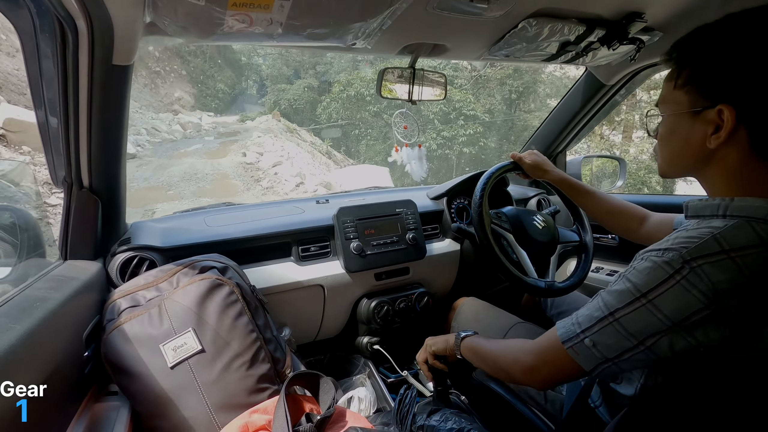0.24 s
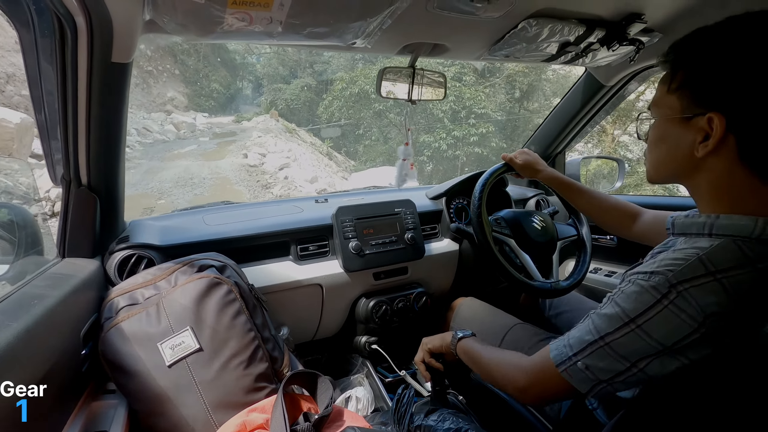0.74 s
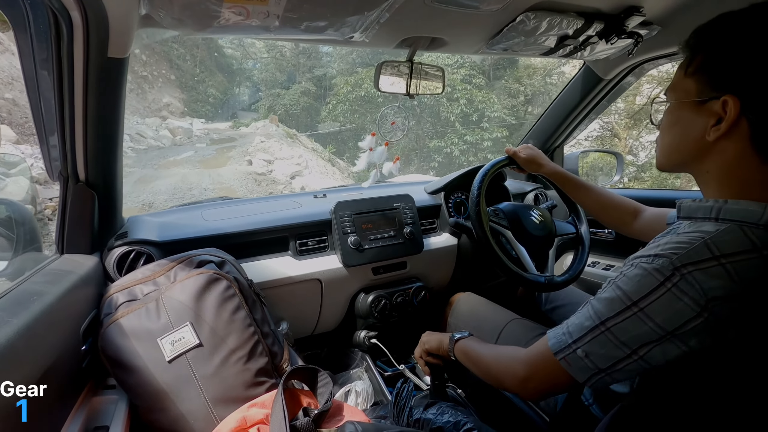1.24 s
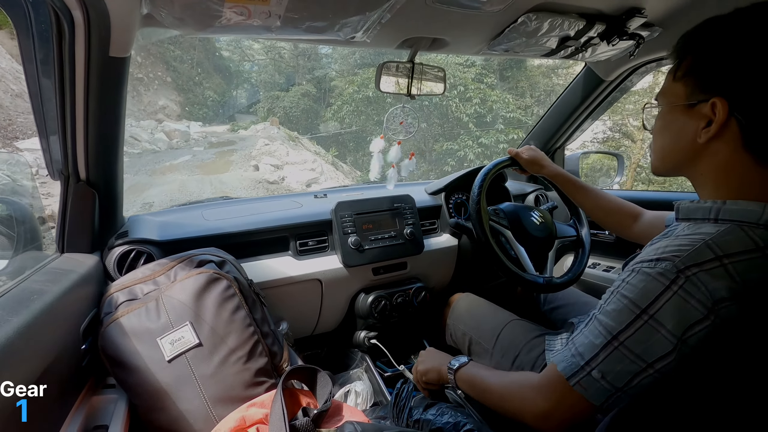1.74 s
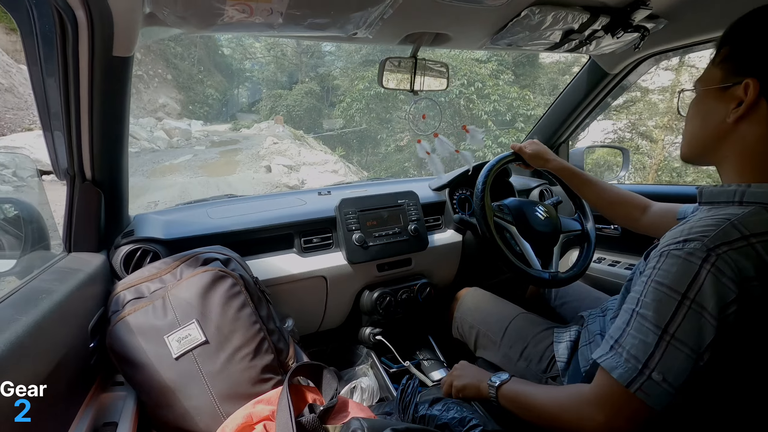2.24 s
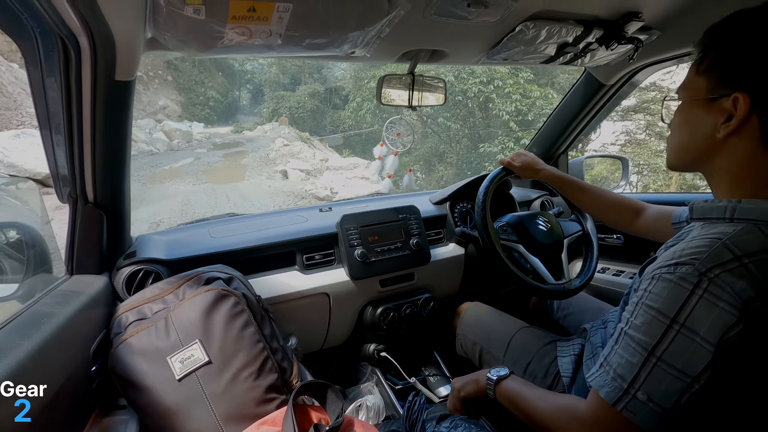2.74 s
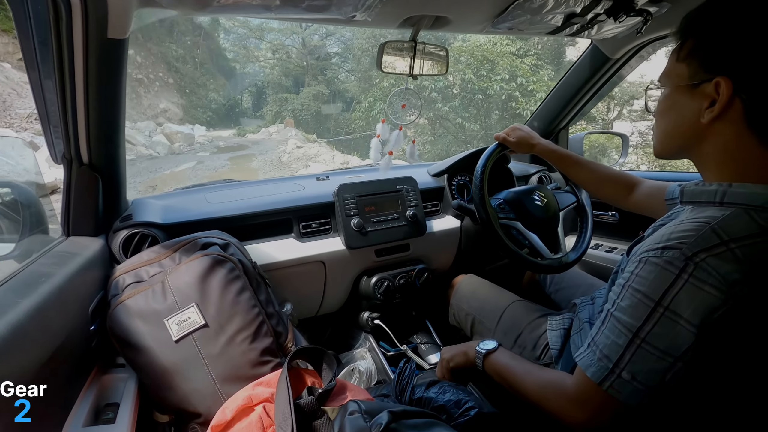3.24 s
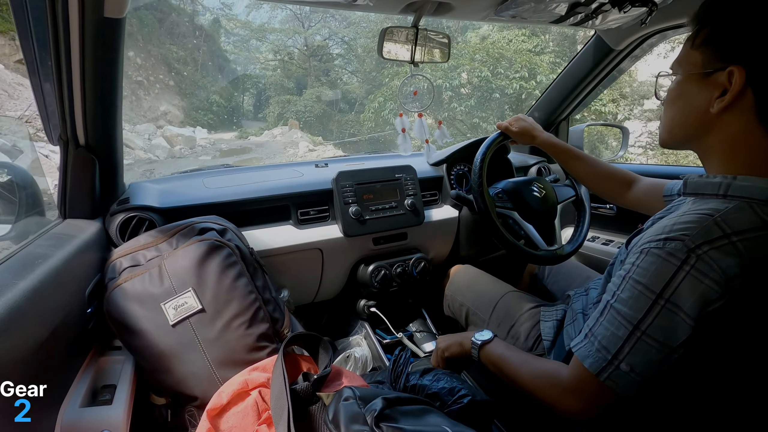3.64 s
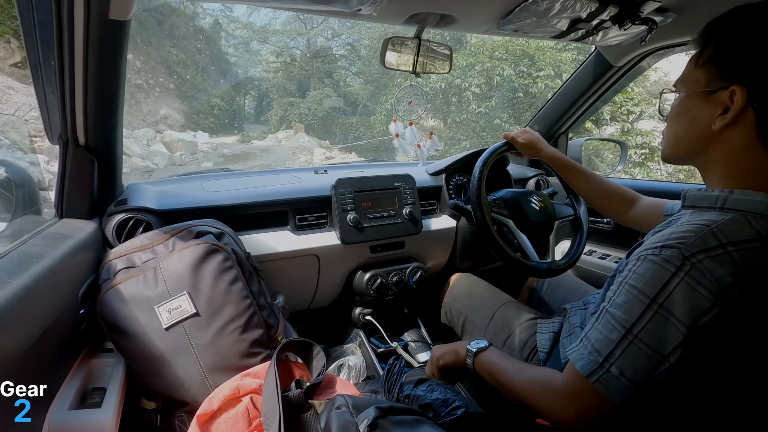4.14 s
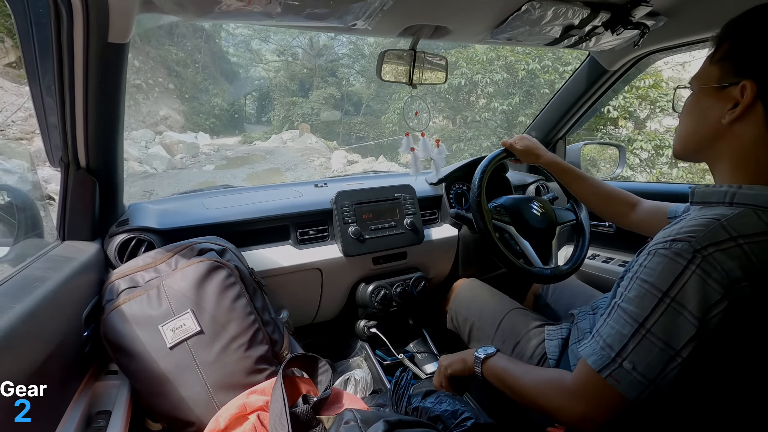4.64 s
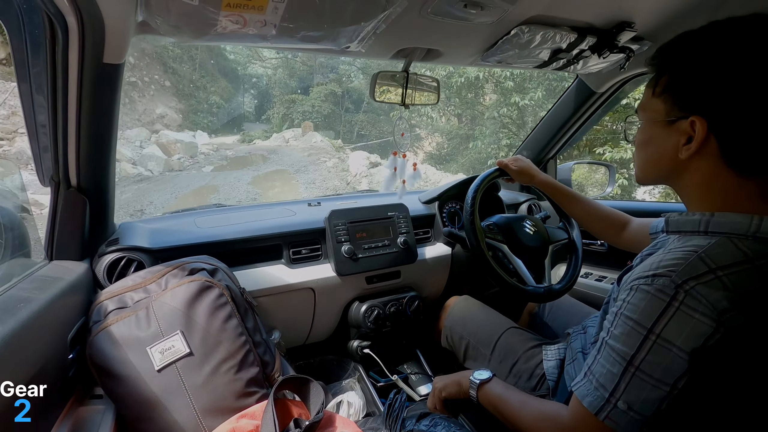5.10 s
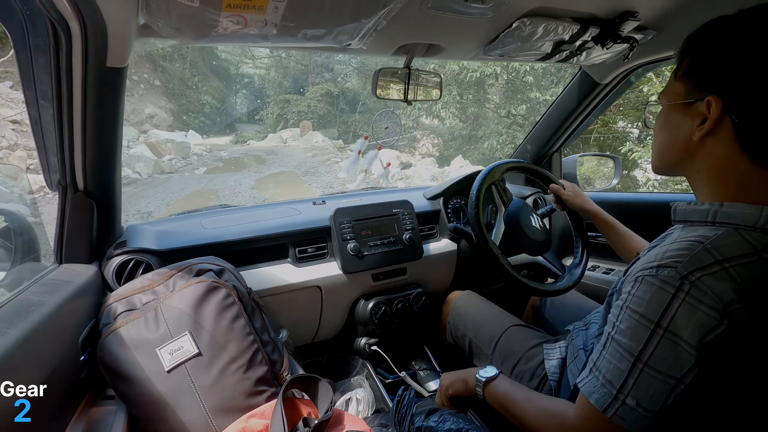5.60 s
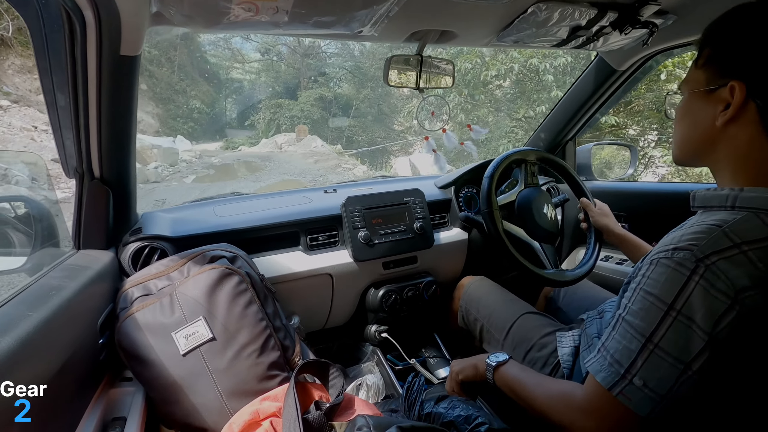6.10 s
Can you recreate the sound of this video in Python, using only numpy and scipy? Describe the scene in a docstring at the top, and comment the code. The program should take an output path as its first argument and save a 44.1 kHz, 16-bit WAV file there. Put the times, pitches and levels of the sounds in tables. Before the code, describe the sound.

A microphone in the cabin of a slowly driven car catches a heavy, uneven low-frequency throb, humming floor and door panels, and muffled tyre rumble. Wheels drop off stones with hollow lumps; plastic trim snaps and loose parts knock. Keys chink faintly near the beginning and middle. The roughest cluster of crunching and knocking comes from about three to four and a half seconds, then a calmer stretch follows.

```python
"""Deep wavering boom of the air in a small car crawling over a broken mountain road, windows shut:
two near-sines, pushed in pitch by the shaken body. Filtered noise gives heave, buffeting, panel drone, tyre rumble
and engine hiss through the dash; random grains and noise give stone crunch, dust, thuds and chatter.
Floor panels hum as wavering sines. Trim ticks are short bursts and rings, keys chink as rough rings,
and knocks drive the resonances of loose fittings."""
import sys
import numpy as np
from scipy import signal
from scipy.fft import rfft, irfft
from scipy.io import wavfile
from scipy.ndimage import uniform_filter1d, minimum_filter1d

SR = 44100
rng = np.random.default_rng(int(sys.argv[2]) if len(sys.argv) > 2 else 0)


def generate_wav(signal):
    """Clip the signal to [-1, 1] and save it as 16-bit WAV at the path in sys.argv[1]."""
    frames = np.transpose(np.atleast_2d(signal))
    scaled = np.clip(frames, -1, 1) * 32767
    pcm = np.round(scaled).astype(np.int16)
    wavfile.write(sys.argv[1], SR, pcm)


N = 280476


def amp(db):
    """Amplitude ratio of a level in dB."""
    return 10 ** (np.asarray(db) / 20)


def rms_one(x):
    """Scales x to rms 1."""
    return x / np.sqrt(np.mean(x ** 2) + 1e-20)


def noise():
    """White noise of full length."""
    return rng.standard_normal(N)


def in_time(rows):
    """Columns of a curve table, one value per sample."""
    time_s, *columns = np.transpose(rows)
    return [np.interp(np.arange(N) / SR, time_s, column) for column in columns]


def drift(rate_hz):
    """Slow random curve of spread 1: noise through two equal poles, computed every 40 samples."""
    r = np.exp(-80 * np.pi * rate_hz / SR)
    steps = rng.standard_normal(N // 40 + 2002)
    slow = signal.lfilter([1], [1, -2 * r, r * r], steps)[2000:]   # settled part
    return np.interp(np.arange(N) / 40, np.arange(len(slow)), rms_one(slow))


def coloured(x, spectrum):
    """Filters x by a spectrum of (frequency [Hz], gain [dB]) points; rms 1."""
    hz, gain_db = np.transpose(spectrum)
    grid_hz = np.arange(N // 2 + 1) * SR / N + 1e-3   # keeps the log finite
    gain = amp(np.interp(np.log(grid_hz), np.log(hz), gain_db))
    return rms_one(irfft(rfft(x) * gain, N))


def resonances(x, modes):
    """Parallel resonances of (frequency [Hz], width [Hz], gain [dB]), signs alternating."""
    out = 0
    for k, (hz, width_hz, gain_db) in enumerate(modes):
        r = np.exp(-np.pi * width_hz / SR)
        b = [(1 - r * r) / 2, 0, (r * r - 1) / 2]
        a = [1, -2 * r * np.cos(2 * np.pi * hz / SR), r * r]
        out = out + (-1) ** k * amp(gain_db) * signal.lfilter(b, a, x)
    return out


def add(out, time_s, sound):
    """Mixes a short sound in at time_s."""
    at = round(time_s * SR)
    out[at:at + len(sound)] += sound[:N - at]


def decay(t60_s):
    """Time axis and envelope of a ring falling 60 dB in t60_s."""
    t = np.arange(SR // 5) / SR
    return t, amp(-60 * t / t60_s)


def grains(per_s, spread_db):
    """Random clicks, most small, a few large."""
    sizes = amp(spread_db * np.minimum(rng.exponential(1, N), 5))
    signs = rng.choice([-1, 1], N)
    return sizes * signs * (rng.random(N) < per_s / SR)


def ring(clicks, hz, t60_s):
    """A unit click sets a sine of height 1 ringing."""
    r, w = amp(-60 / (t60_s * SR)), 2 * np.pi * hz / SR
    return signal.lfilter([0, np.sin(w)], [1, -2 * r * np.cos(w), r * r], clicks + 1e-18)


def band_noise(edges_hz, envelope, crack=0):
    """A burst of noise kept steeply inside a band; peak 1."""
    burst = rng.standard_normal(len(envelope)) * envelope
    burst[0] += crack   # one hard first contact
    burst = signal.sosfilt(signal.butter(3, edges_hz, "band", fs=SR, output="sos"), burst)
    return burst / np.abs(burst).max()


# cabin air modes: (time [s], pitch [Hz], level [dB])
LOWER_BOOM = [(0.0, 21.1, -17), (0.05, 22.2, -12), (0.23, 21.4, -35), (0.4, 20.53, -20), (0.96, 21.36, -23),
              (1.19, 24.45, -48), (1.35, 26.03, -24), (2.15, 25.26, -17.5), (2.25, 25.09, -27),
              (3.0, 24.83, -14), (3.13, 25.34, -28), (3.35, 24.96, -19), (3.85, 23.52, -17),
              (4.0, 27.79, -18.5), (4.25, 25.41, -17.5), (4.8, 22.37, -20), (5.0, 24.09, -27),
              (5.25, 24.67, -30.5), (5.49, 27.09, -15), (5.6, 27.58, -41.5), (5.8, 24.98, -18.5),
              (6.36, 23.1, -22.5)]
UPPER_BOOM = [(0.0, 34.84, -11), (0.25, 34.26, -37.5), (0.41, 33.16, -20.5), (0.69, 34.95, -41),
              (0.8, 37.4, -18), (1.1, 36.27, -36.5), (1.35, 36.86, -26.5), (2.2, 38.01, -29),
              (2.42, 32.87, -28.5), (2.55, 33.12, -23.5), (2.94, 36, -32), (3.05, 35.2, -29),
              (3.3, 32.9, -23), (3.55, 35, -25), (3.83, 40.18, -28), (4.25, 38.1, -18), (4.45, 38, -25.5),
              (4.8, 36.14, -24.5), (5.2, 35.16, -31.5), (6.0, 45.12, -27.5), (6.18, 37.99, -20),
              (6.36, 34.74, -35)]


def boom(hz, level_db, waver):
    """A slab of cabin air swings almost as a sine, its pitch pushed about by the body."""
    wavering_hz = hz * (1 + waver * drift(4.36))
    phase = 2 * np.pi * np.cumsum(wavering_hz) / SR + rng.uniform(0, 2 * np.pi)
    return np.sqrt(2) * amp(level_db + 1.6 * drift(4.8)) * np.sin(phase)


# body on its springs: (time [s], level [dB])
HEAVE_LEVEL = [(0.0, -24), (0.14, -36.5), (0.71, -20), (1.22, -28.5), (1.84, -24), (2.85, -41), (2.99, -28),
               (3.12, -42), (3.17, -28), (3.45, -42), (3.54, -26), (4.53, -32.5), (4.75, -16), (4.9, -22),
               (4.99, -45), (5.07, -24.5), (5.47, -31.5), (5.61, -39), (5.69, -31), (5.99, -28),
               (6.08, -26), (6.36, -16)]


def heave():
    """The springs let the whole cabin breathe, below the pitch of the booms."""
    level_db, = in_time(HEAVE_LEVEL)
    springs = [(14.7, 13.1, 0)]   # Hz, width Hz, dB
    return amp(level_db) * rms_one(resonances(resonances(noise(), springs), springs))


def buffet():
    """The air buffets: low noise through two equal resonances, swelling by chance."""
    cabin = [(21.5, 27.3, 0)]   # Hz, width Hz, dB
    air = rms_one(resonances(resonances(noise(), cabin), cabin))
    return amp(-29.5 + 3.07 * drift(4.7)) * air


# body shaking: (time [s], at doors, roof and lower floor panel [dB], at upper floor panel [dB])
SHAKE = [(0.0, -5, 3.5), (0.2, 3, 3), (0.48, 6.5, -1), (0.68, -9.5, -11.5), (0.8, 4.5, 4.5),
         (1.08, -0.5, 1.5), (1.5, 2, 2.5), (1.75, -8, -9), (1.95, -1.5, -8), (2.55, -5, -3.5),
         (2.8, -1, 6.5), (3.2, 1, -1), (3.42, -1.5, -16), (3.55, 5.5, 7), (4.05, -0.5, -2.5),
         (4.17, -2, 10), (4.3, 1, -1.5), (4.85, 1.5, -3.5), (4.98, -12.5, -6.5), (5.26, -3.5, -8.5),
         (5.8, -5.5, -6.5), (6.15, 2, 8), (6.36, -6, 2)]
# floor panels, lower then upper: (pitch [Hz]); (waver [share of pitch])
FLOOR_HZ = (80.36, 101.36)
FLOOR_WAVER = (0.0218, 0.03375)
FLOOR_DB = (-32, -34)   # peak, before shaking and swell


def floor_panels(shakes_db):
    """Each panel hums near its own pitch, which the shaking blurs, and swells and fades by chance."""
    out = 0
    for hz, waver, level_db, shake_db in zip(FLOOR_HZ, FLOOR_WAVER, FLOOR_DB, shakes_db):
        swell = amp(level_db + shake_db + 2.2 * drift(6.0))
        wavering_hz = hz * (1 + waver * drift(3.5))
        out = out + swell * np.sin(2 * np.pi * np.cumsum(wavering_hz) / SR)
    return out


# doors and roof: (frequency [Hz], width [Hz], gain [dB])
PANEL_MODES = [(57.6, 7.7, 0.5), (133.5, 23, 0)]
DRONE_DB, DRONE_FOLLOWS = -44.5, 0.54   # base level, share of the shaking's dB swing


def panel_drone(shake_db):
    """Doors and roof drone: noise through their modes, then one broad resonance."""
    drone = rms_one(resonances(resonances(noise(), PANEL_MODES), [(92, 170, 0)]))
    return amp(DRONE_DB + DRONE_FOLLOWS * shake_db) * drone


# tyre rumble: (frequency [Hz], spectral density [dB])
RUMBLE_SPECTRUM = [(26, -27), (45, -5.5), (59, -9.5), (106, -12), (160, -20), (230, -30.5), (400, -67),
                   (900, -120)]
RUMBLE_DB = -31   # before the road curve


def tyre_rumble(tyre_db):
    """Tyres rumble: low noise, fluttering slightly, following the road."""
    return amp(RUMBLE_DB + tyre_db) * coloured(noise() * amp(1.0 * drift(8.5)), RUMBLE_SPECTRUM)


# crunch and dust: (frequency [Hz], spectral density [dB])
CRUNCH_SPECTRUM = [(350, -23.5), (600, -13), (870, -5), (946, 0.5), (1040, -0.5), (1310, 0), (1900, -4.5),
                   (3200, -16.5), (4160, -47.5), (7040, -120)]
DUST_SPECTRUM = [(1500, -21.5), (2600, -3), (3200, -3.5), (5000, -2), (6800, -7.5), (7600, -13),
                 (10500, -24), (12500, -28), (15000, -33.5)]
CRUNCH_DB, DUST_DB, DUST_FOLLOWS = -59.5, -67, 0.7   # base levels, share of coarseness dB swing


def crunch_and_dust(coarse_db):
    """Stones crack in clumps under the tyres; dust hisses, carrying some of the same cracks."""
    stones = rms_one(grains(1500 * amp(4.5 * drift(24)), spread_db=0.5))
    crunch = coloured(stones + 0.5 * noise(), CRUNCH_SPECTRUM)
    dust = coloured(noise() * amp(1.1 * drift(26)) + 0.13 * stones, DUST_SPECTRUM)
    return amp(CRUNCH_DB + coarse_db) * crunch + amp(DUST_DB + DUST_FOLLOWS * coarse_db) * dust


# modes of loose fittings: (frequency [Hz], t60 [s])
FITTINGS = [(137, 0.57), (185, 0.12), (240, 0.1), (310, 0.016), (390, 0.016), (535, 0.08), (660, 0.043),
            (740, 0.048), (850, 0.045), (1010, 0.033), (1140, 0.035), (1250, 0.027), (1400, 0.045),
            (1700, 0.015), (1870, 0.028)]


def chatter(coarse_db):
    """Loose fittings ring from light random clicks, more often on coarse stone."""
    clicks_per_s = 45 * amp(1.3 * coarse_db + 6.5 * drift(9.5))
    # all but the lowest mode
    rings = sum(ring(grains(clicks_per_s, spread_db=2.0), hz, t60_s) for hz, t60_s in FITTINGS[1:])
    return amp(-65.0) * rings


# wheel arches: (time [s], level [dB]); (frequency [Hz], spectral density [dB])
THUD_LEVEL = [(0.06, -39.5), (0.18, -46), (0.21, -43), (0.31, -47), (0.89, -44), (0.98, -50), (1.1, -40.5),
              (1.17, -45.5), (1.26, -44.5), (1.4, -46), (1.62, -46.5), (1.64, -53), (1.78, -39), (1.8, -48),
              (1.88, -44.5), (1.9, -45), (1.99, -51.5), (2.11, -44), (2.28, -51.5), (2.42, -46.5),
              (2.63, -52), (2.67, -41), (2.7, -46.5), (2.98, -35.5), (3.01, -42.5), (3.9, -38),
              (3.92, -36.5), (3.95, -40.5), (4.07, -39.5), (4.11, -42), (4.79, -45), (4.8, -50),
              (4.96, -46), (5.41, -57.5), (5.45, -46.5), (5.57, -51.5), (5.71, -41.5), (5.86, -46.5),
              (6.04, -39.5), (6.18, -42.5), (6.23, -41), (6.27, -42.5), (6.3, -46)]
ARCH_SPECTRUM = [(110, -31), (170, -2.5), (220, -2), (300, -7.5), (420, -14), (540, -19), (680, -26),
                 (950, -33), (1300, -69.5), (2000, -120)]


def thuds():
    """Tyres drop off stones: dull lumps in quick uneven succession over a hollow roar."""
    level_db, = in_time(THUD_LEVEL)
    lumps = rms_one(grains(300 * amp(3.0 * drift(14)), spread_db=2.5))
    roar = noise() * amp(1.4 * drift(13))
    return amp(level_db) * coloured(0.63 * lumps + roar, ARCH_SPECTRUM)


# engine through the dash: (time [s], level [dB]); (frequency [Hz], spectral density [dB])
ENGINE_LEVEL = [(0.0, -52.5), (0.15, -57.5), (0.95, -60), (1.3, -57.5), (1.7, -60), (3.0, -60), (3.9, -61),
                (5.15, -64.5), (5.86, -60), (6.36, -62.5)]
HISS_SPECTRUM = [(710, -30.5), (1200, -8.5), (1650, -4), (1960, 1.5), (2300, -3.5), (2960, -9), (3380, -1),
                 (3780, 0), (4230, -6), (4550, -4.5), (4950, -9.5), (5900, -19), (6930, -20.5),
                 (7600, -34.5), (9000, -33.5), (11700, -60), (19800, -120)]


def engine():
    """Valve-train hiss, noise and sparse grains coloured by the hollows of the dash."""
    level_db, = in_time(ENGINE_LEVEL)
    air = noise() * amp(1.3 * drift(20)) + 0.05 * grains(300, spread_db=9.0)
    return amp(level_db) * coloured(air, HISS_SPECTRUM)


# trim ticks, levels before the offsets of the parts: (time [s], snap level [dB], puff level [dB])
TICKS = [(0.0191, -27.5, -52), (0.0358, -39, -30), (0.0807, -32.5, -61), (0.61, -42, -40),
         (0.8715, -39, -56), (0.962, -42, -43.5), (1.234, -43.5, -41.5), (2.164, -43.5, -47),
         (2.3454, -45, -42.5), (2.4833, -50, -47), (2.898, -46, -52), (2.9616, -52, -46),
         (3.0158, -50, -43.5), (3.0733, -38.5, -57), (3.1897, -42.5, -52), (3.2075, -41, -45.5),
         (3.4787, -50, -40), (3.675, -59, -46), (3.9892, -43, -62), (4.117, -42, -59), (4.343, -59, -43.5),
         (4.371, -44, -64), (4.424, -43, -57), (4.434, -60, -51), (4.575, -48, -66), (4.7093, -57, -44.5),
         (4.9152, -47, -45), (5.254, -43, -44.5), (5.671, -52, -43), (5.9275, -50, -42.5),
         (6.0132, -46, -41)]
SNAP_BAND_HZ, PUFF_BAND_HZ, TREBLE_BAND_HZ = (1050, 1990), (2290, 4530), (4640, 6960)
SNAP_RING_HZ, PING_HZ = 2314, 3645   # means; each tick varies


def ticks():
    """Plastic trim: a dry snap, a higher ping and a puff of treble that dies in the upholstery."""
    out = np.zeros(N)
    t, tail = decay(0.067)
    rise = 1 - np.exp(-t / 0.0006)
    snap_fall, ring_fall = decay(0.007)[1], decay(0.009)[1]
    for time_s, snap_db, puff_db in TICKS:
        snap_hz, ping_hz = np.array([SNAP_RING_HZ, PING_HZ]) * rng.normal(1, .03, 2)
        snap = band_noise(SNAP_BAND_HZ, snap_fall, crack=2.5)
        snap_ring = rise * ring_fall * np.sin(2 * np.pi * snap_hz * t)
        ping = rise * ring_fall * np.sin(2 * np.pi * ping_hz * t)
        puff = band_noise(PUFF_BAND_HZ, rise * tail, crack=3.3)
        treble = band_noise(TREBLE_BAND_HZ, rise * tail, crack=1.5)
        add(out, time_s, amp(snap_db - 5.5) * snap)
        add(out, time_s, amp(snap_db + 4) * snap_ring)
        add(out, time_s, amp(puff_db + 1.5) * ping)
        add(out, time_s, amp(puff_db - 5.0) * puff)
        add(out, time_s, amp(puff_db - 10) * treble)
    return out


# key touches: (time [s], strike level [dB], centre of modes struck [Hz], fall-off [dB/octave])
CHINKS = [(0.137, -49, 5550, 50), (0.7564, -49.5, 11900, 45), (0.7585, -53, 7800, 32),
          (3.2742, -65, 11500, 45), (3.284, -50, 5550, 26), (3.287, -56, 10400, 22), (3.307, -60, 8300, 37)]
# key modes: (frequency [Hz], t60 [s])
KEY_MODES = [(5550, 0.054), (8050, 0.026), (9520, 0.082), (11500, 0.053), (12650, 0.034)]


def chinks():
    """Each touch of the keys strikes hardest the modes near its centre; jostling roughens the rings."""
    out = np.zeros(N)
    for time_s, strike_db, centre_hz, fall_db in CHINKS:
        for hz, t60_s in KEY_MODES:
            mode_db = strike_db - fall_db * abs(np.log2(hz / centre_hz))
            t, envelope = decay(t60_s)
            envelope = envelope * (1 - np.exp(-t / .0008))
            pure = envelope * np.sin(2 * np.pi * hz * t)
            rough = band_noise((hz * .975, hz * 1.025), envelope)
            add(out, time_s, amp(mode_db) * (0.8 * pure + 0.45 * rough))
    return out


# suspension and fittings: (time [s], blow level [dB], centre of modes struck [Hz], spread [octaves])
KNOCKS = [(.43, -40.5, 137, .1), (0.611, -47.5, 890, 0.56), (0.825, -44, 900, 0.67),
          (0.875, -51, 1410, 0.6), (.97, -36, 137, .1), (1.065, -55, 547, 0.23), (1.08, -41, 390, 0.11),
          (1.099, -35, 245, 0.13), (1.15, -43.5, 730, 0.16), (1.25, -48, 1710, 0.061),
          (1.268, -47, 1730, 0.071), (1.733, -47, 300, 0.44), (1.744, -46, 1390, 0.35),
          (1.752, -43, 800, 0.72), (1.756, -48, 563, .25), (1.772, -34, 202.6, 0.22),
          (1.763, -54, 1150, .35), (1.775, -57, 1350, .3), (1.904, -33, 238, 0.47), (2.1, -43, 138, .1),
          (2.494, -49, 729, 0.16), (2.63, -36.5, 138, 0.11), (2.67, -41.5, 1003, 0.14),
          (2.804, -40.5, 1130, 0.12), (2.812, -47, 1870, 0.089), (2.847, -43, 750, 0.17),
          (2.812, -36, 320.7, 0.43), (2.92, -44, 402, 0.56), (2.954, -41, 529.7, 0.16),
          (2.961, -38, 1040, 0.27), (3.018, -41, 800, 0.46), (3.062, -49.5, 1400, 0.28),
          (3.066, -34.5, 427, 0.16), (3.085, -46, 1380, 0.15), (3.118, -51, 1500, .4),
          (3.209, -51, 300, 0.39), (3.455, -44, 1266, 0.1), (3.577, -43, 860, 0.39),
          (3.63, -42, 1210, 0.14), (3.746, -39.5, 1106, 0.59), (3.769, -40.5, 646, 0.54),
          (3.82, -31.5, 136.8, .1), (3.861, -41, 1208, 0.28), (4.03, -40, 252.8, 0.21),
          (4.082, -44, 493.4, 0.23), (4.114, -44.5, 716.7, 0.16), (4.264, -42, 1177, 0.31),
          (4.382, -47, 748, 0.22), (4.388, -49.5, 1150, .15), (4.482, -38.5, 1261, 0.073),
          (4.503, -41, 635, 0.54), (4.513, -49, 1270, .12), (4.574, -47, 1250, 0.26),
          (4.58, -48.5, 740, 0.11), (4.668, -51, 1250, 0.057), (5.929, -49, 545, 0.16),
          (6.079, -46, 795, 0.17), (6.182, -44, 1083, .2)]


def knocks():
    """Each blow shares its energy among the modes near its centre; the padded contact lasts and scuffs."""
    time_s, blow_db, centre_hz, octaves = np.transpose(KNOCKS)
    distance = np.log2(np.array(FITTINGS)[:, :1] / centre_hz) / octaves
    shares = np.exp(-.5 * distance ** 2)
    shares = shares / np.sqrt(np.sum(shares ** 2, axis=0))   # squares sum to 1 per blow
    contact = np.hanning(round(0.018 * SR))
    out, t = 0, np.arange(N) / SR
    for (hz, t60_s), share in zip(FITTINGS, shares):
        blows = np.zeros(N)
        blows[((time_s + .002) * SR).astype(int)] = amp(blow_db) * share
        pressure = signal.oaconvolve(blows, 4 * contact / contact.sum(), "same")
        # parts rub partly at the pace of the mode, partly at random
        rub = 0.9 * np.sin(2 * np.pi * hz * t) + 3.5 * noise()
        out = out + ring(pressure * rub, hz, t60_s)
    return out


# road under the wheels: (time [s], stone coarseness [dB], tyre rumble [dB])
ROAD = [(0.0, 4.5, 4), (0.3, -6.5, 0), (0.55, -4, 3.5), (0.65, -1.5, -15), (0.76, -2.5, -6), (0.85, 1, -5),
        (1.0, -6.5, 4), (1.2, -3.5, -0.5), (1.65, -5.5, -3.5), (1.8, 2, 4.5), (2.0, -3.5, -2),
        (2.25, -3, -7), (2.55, 3.5, -0.5), (2.74, -1.5, 2), (2.82, 8.5, 5), (2.93, 4.5, 1), (2.98, 9.5, 2),
        (3.08, 8, 3.5), (3.14, 4.5, 5.5), (3.25, 4.5, 5), (3.38, 4.5, 6), (3.46, 5.5, 4.5), (3.55, 6.5, -2),
        (3.62, 7, 6.5), (3.7, 3.5, 3), (3.8, 9.5, 5.5), (3.88, 10, 5.5), (3.96, 4, 2), (4.1, 4.5, -1),
        (4.32, 1.5, 4.5), (4.5, 3, -3), (4.62, 1.5, 3), (4.8, 0.5, -14.5), (5.2, -4, -14), (5.5, -1.5, -3),
        (5.95, 4, 2.5), (6.36, 4, 3)]


def scene():
    """Sums all sources to one channel; road and shaking curves drive several of them."""
    coarse_db, tyre_db = in_time(ROAD)
    shakes_db = in_time(SHAKE)
    booms = boom(*in_time(LOWER_BOOM), waver=0.0812) + boom(*in_time(UPPER_BOOM), waver=0.0609)
    body = booms + heave() + buffet() + floor_panels(shakes_db) + panel_drone(shakes_db[0])
    road = tyre_rumble(tyre_db) + crunch_and_dust(coarse_db) + chatter(coarse_db) + thuds()
    return (body + road + engine() + ticks() + chinks() + knocks())[None]


LIMIT, OVER_FALL_DB_S = .27, 40   # threshold amplitude, fall of the held overshoot
CUTOFF_HZ = 15400


def record(dry):
    """A soft limiter takes off 3/4 of the held overshoot in dB, looking 10 ms ahead; the top is cut."""
    over_db = np.maximum(20 * np.log10(np.abs(dry) / LIMIT + 1e-9), 0)
    ramp_db = OVER_FALL_DB_S * np.arange(N) / SR
    held_db = np.maximum.accumulate(over_db + ramp_db, axis=1) - ramp_db
    ahead_db = -minimum_filter1d(-held_db, size=883, axis=1)   # running maximum
    limited = dry * amp(-.75 * uniform_filter1d(ahead_db, size=441, axis=1))
    return signal.sosfilt(signal.cheby2(10, 60, CUTOFF_HZ, fs=SR, output="sos"), limited)


dry = scene()
out = record(dry)
generate_wav(out)
```